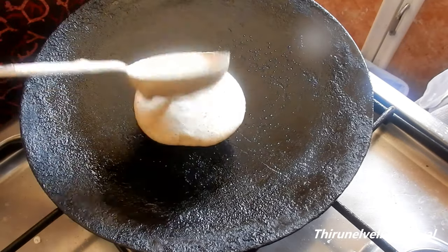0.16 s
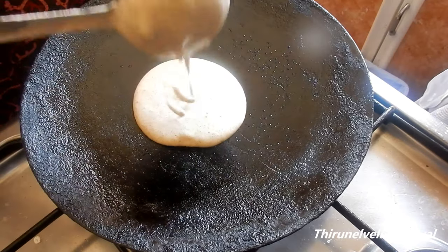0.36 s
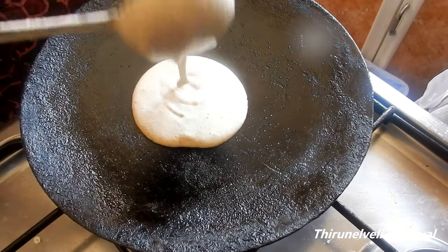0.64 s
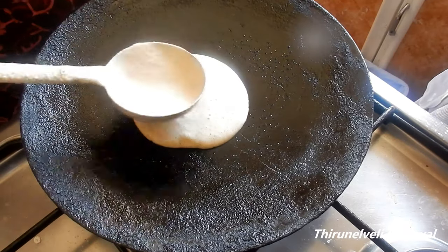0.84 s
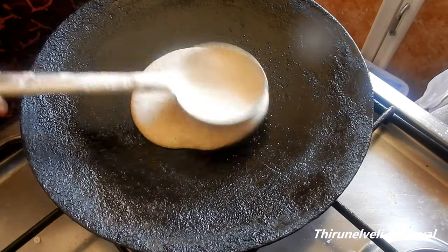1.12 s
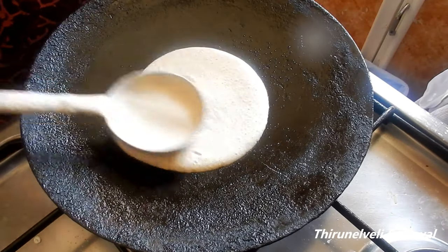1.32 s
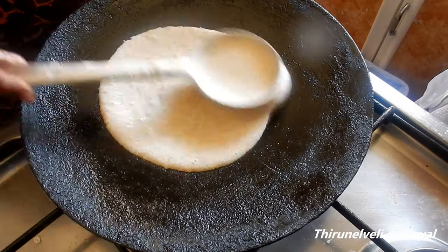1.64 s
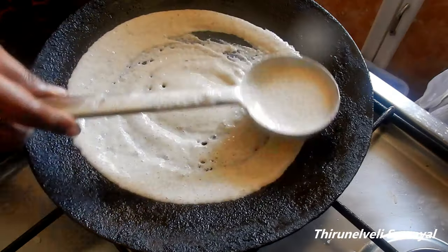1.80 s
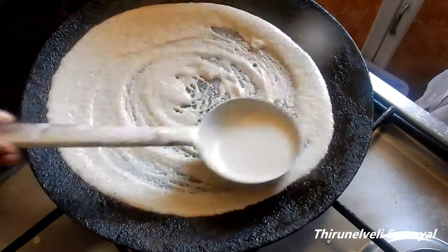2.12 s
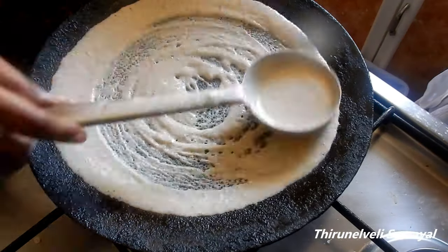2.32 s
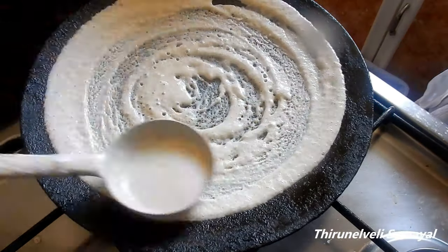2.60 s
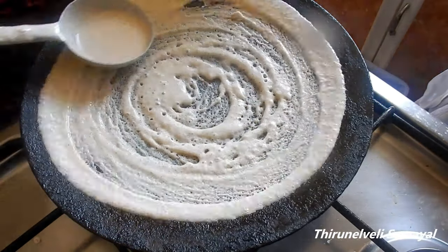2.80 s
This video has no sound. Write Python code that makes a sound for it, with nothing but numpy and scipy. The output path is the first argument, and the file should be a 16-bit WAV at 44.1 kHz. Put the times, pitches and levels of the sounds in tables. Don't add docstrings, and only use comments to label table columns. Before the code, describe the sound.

Roaring, crackling sizzle of batter on hot iron cuts to a softer ladle scrape with fizzing and squeals

```python
import sys
import numpy as np
from scipy import signal
from scipy.fft import rfft, irfft
from scipy.io import wavfile
from scipy.ndimage import uniform_filter1d

SR = 44100
rng = np.random.default_rng(int(sys.argv[2]) if len(sys.argv) > 2 else 0)


def linear_from_db(decibels):
    return 10 ** (np.asarray(decibels, float) / 20)


def file_out(sig):
    cols = np.atleast_2d(sig).T
    lim = np.clip(cols, -1, 1)
    pcm = np.round(lim * 32767).astype(np.int16)
    wavfile.write(sys.argv[1], SR, pcm)


N = 130095
T = np.arange(N) / SR
SPLICE_S, RESUME_S = 1.769, 1.829

# (time [s], steam roar level [dB], crackle level [dB])
BOIL_LEVELS = [(0, -26.5, -46), (.1, -24, -45.5), (.2, -25, -48), (.33, -24.5, -46.5), (.43, -27.5, -49),
               (.6, -27, -49.5), (.72, -26, -49), (.83, -27, -48), (.9, -27, -48), (1.01, -25.5, -59),
               (1.08, -28, -52), (1.14, -27, -53), (1.175, -28.5, -58), (1.21, -24.5, -50),
               (1.27, -29, -44), (1.45, -32, -43), (1.6, -32.5, -45.5), (1.77, -32, -47)]
# (time [s], scrape level [dB], fizz level [dB])
SPREAD_LEVELS = [(1.835, -52, -39), (1.865, -44.5, -34.5), (1.91, -52.5, -42), (2.01, -51.5, -47),
                 (2.09, -52, -45.5), (2.12, -45.5, -41), (2.21, -45.5, -41.5), (2.245, -52, -47),
                 (2.27, -46, -43), (2.45, -46.5, -43), (2.6, -47.5, -44), (2.72, -46, -43),
                 (2.755, -47.5, -44), (2.78, -49.5, -41), (2.85, -46.5, -43.5), (2.95, -47, -46)]
# (frequency [Hz], level [dB])
WIDTH_BOIL = [(60, -9.5), (200, -8.5), (700, -20.5), (2400, -23.5), (4400, -20), (8000, -9), (15000, -5)]
# (frequency [Hz], level [dB])
WIDTH_SPREAD = [(200, -1), (700, -5), (1300, -11), (4400, -10), (8000, -19), (15000, -12)]


def unit(x):
    return x / np.sqrt(np.mean(x ** 2))


def curve(table, column):
    rows = np.array(table)
    return linear_from_db(np.interp(T, rows[:, 0], rows[:, column]))


def noise_pair():
    return rng.standard_normal((2, N))


def walk(rate_hz):
    hold = int(SR / rate_hz)
    steps = np.repeat(rng.standard_normal(N // hold + 1), hold)
    slewed = uniform_filter1d(uniform_filter1d(steps, hold), hold)
    return unit(slewed[:N])


def colour(x, *shapes):
    log_hz = np.log(np.arange(1025) * SR / 2048 + 1)
    db = 0
    for shape in shapes:
        hz, level_db = np.array(shape).T
        db = db + np.interp(log_hz, np.log(hz), level_db)
    cepstrum = irfft(np.log(linear_from_db(db)))
    cepstrum[1:1024] *= 2
    cepstrum[1025:] = 0
    impulse = irfft(np.exp(rfft(cepstrum)))
    return signal.fftconvolve(x, impulse)[:N]


def resonate(x, hz, width_hz):
    return signal.lfilter(*signal.iirpeak(hz, hz / width_hz, SR), x)


def ring(x, modes):
    out = np.zeros(N)
    for hz, width_hz, db in modes:
        shimmer_db = 1.8 * walk(25.)
        out += linear_from_db(db + shimmer_db) * resonate(x, hz, max(width_hz, 5))
    return unit(out)


def grains(rate_hz, spread_db, hiss):
    chance, sign, luck = rng.random((3, N))
    size = linear_from_db(-spread_db * np.log(luck + .02))
    bursts = (chance < rate_hz / SR) * np.sign(sign - .5) * size
    return unit(unit(bursts) + hiss * rng.standard_normal(N))


def wide(x, other, shape, width, pan_db):
    mid = colour(x, shape)
    side = colour(other, shape, width)
    norm = np.sqrt(np.mean(mid ** 2))
    pan = linear_from_db(np.array([[pan_db], [-pan_db]]) / 2)
    return (mid + side * np.array([[1], [-1]])) / norm * pan


def hits(table, tail_s):
    kick = np.zeros(N)
    for s, db in table:
        kick[int(s * SR)] = linear_from_db(db)
    tail = signal.lfilter([1], [1, -np.exp(-1 / (tail_s * SR))], kick)
    return kick + .12 * tail * rng.standard_normal(N)


def iron(x):
    # (frequency [Hz], width [Hz], level [dB])
    iron_modes = [(878, 13, -18), (1208, 38, -2.5), (1340, 52, -1.5), (1492, 10.5, 5), (1693, 54, 0.5),
                  (1980, 55, -8.5), (2111, 41, 0.5), (2325, 39, 4), (2534, 49, -2), (2600, 7.4, 4),
                  (2800, 44, -4.5), (3070, 71, -6.5), (3214, 110, -7), (4340, 82, -10)]
    # (frequency [Hz], width [Hz], share removed [1])
    dead_spots = [(686, 127, 0.76), (1033, 27, 0.62), (1473, 190, 0.49), (2510, 105, 0.51),
                  (3840, 490, 0.56)]
    y = x + linear_from_db(-14) * ring(x, iron_modes)
    for hz, width_hz, share in dead_spots:
        y = y - share * resonate(y, hz, width_hz)
    cover_s, covered_s, covered_share = 1.12, 1.2, 0.87
    bare = np.interp(T, [cover_s, covered_s], [1, covered_share])
    return bare * y + (1 - bare) * x


def steam_roar():
    # (frequency [Hz], density [dB per Hz])
    roar_shape = [(300, -29.5), (700, -7.5), (850, -5), (2300, -3.5), (3400, -5), (4400, -8), (6200, -13),
                  (12000, -34.5), (15600, -72)]
    flutter = linear_from_db(.4 * walk(40) + .9 * walk(80))
    steam = [iron(grains(4000., 1.7, 0.91) * flutter) for _ in range(2)]
    return wide(*steam, roar_shape, WIDTH_BOIL, 1.45) * curve(BOIL_LEVELS, 1)


def crackle():
    # (frequency [Hz], density [dB per Hz])
    crackle_shape = [(2500, -17), (4500, 7.5), (7000, 3.5), (11000, -6.5), (16000, -14.5)]
    ticks = grains(900., 2.8, .5) * linear_from_db(1.4 * walk(30))
    scattered = ticks * rng.standard_normal(N)
    return wide(ticks, scattered, crackle_shape, WIDTH_BOIL, 1.45) * curve(BOIL_LEVELS, 2) * linear_from_db(8.5)


def pops():
    # (time [s], peak level [dB])
    pop_hits = [(0.0194, -27), (0.0428, -35), (0.0702, -32), (0.1281, -28), (0.1585, -29), (0.2279, -43),
                (0.2279, -27), (0.2573, -32), (0.2718, -25), (0.3351, -34), (0.3576, -24), (0.379, -33),
                (0.3935, -28), (0.4314, -27), (0.4599, -37), (0.4843, -30), (0.4973, -24), (0.5147, -23),
                (0.5492, -33), (0.6494, -37), (0.6654, -27), (0.7093, -33), (0.7462, -34), (0.7622, -28),
                (0.8106, -33), (0.8195, -30), (0.8465, -28), (0.8954, -29), (0.9996, -36), (1.0101, -36),
                (1.0241, -26), (1.1263, -49), (1.1263, -29), (1.1578, -31), (1.1877, -31), (1.2166, -36),
                (1.2166, -22), (1.289, -27), (1.297, -25), (1.3189, -29), (1.3254, -28), (1.3309, -26),
                (1.3763, -27), (1.4072, -27), (1.4232, -24), (1.4441, -25), (1.4536, -26), (1.4726, -27),
                (1.5015, -21), (1.5419, -27), (1.5883, -28), (1.6372, -30), (1.6372, -27), (1.6601, -30),
                (1.6926, -32), (1.711, -32), (1.7255, -27), (1.7664, -28)]
    # (frequency [Hz], level [dB])
    pop_shape = [(3000, -36), (6000, -19), (8500, -10.5), (11000, -6), (16000, -8)]
    # (time [s], peak level [dB])
    splat_hits = [(0.015, -19), (0.0534, -24), (0.3044, -22.5), (0.337, -22), (0.4964, -15), (0.7617, -28),
                  (0.8454, -23), (1.0174, -23), (1.054, -20), (1.1578, -17), (1.2164, -23), (1.3294, -21),
                  (1.4105, -24), (1.454, -28), (1.5007, -21), (1.5904, -16), (1.6396, -21), (1.7254, -21)]
    # (frequency [Hz], level [dB])
    splat_shape = [(1200, -37), (3000, 0), (5500, 2), (8000, 0), (13000, -28.5)]
    pop = colour(hits(pop_hits, tail_s=.0009), pop_shape) * linear_from_db(19.5)
    splat = colour(hits(splat_hits, tail_s=.0041), splat_shape) * linear_from_db(11.5)
    return (pop + splat) * linear_from_db(np.array([[1.6], [-1.6]]))


def flame():
    # (frequency [Hz], density [dB per Hz])
    flame_shape = [(18, -40), (30, -63), (56, -14), (166, 0), (241, -8), (282, -4), (700, -10), (910, -42),
                   (1540, -120)]
    gas = noise_pair() * linear_from_db(0.2 * walk(11.0))
    rumble = wide(*gas, flame_shape + [(1400, -68)], WIDTH_BOIL, 0.48)
    return rumble * curve(BOIL_LEVELS, 1) * linear_from_db(-15.5)


def steam_air():
    return wide(*noise_pair(), [(6000, -28), (10000, -5)], WIDTH_BOIL, 1.5) * linear_from_db(-68)


def boil():
    return steam_roar() + crackle() + pops() + flame() + steam_air()


def scrape():
    # (frequency [Hz], density [dB per Hz])
    scrape_shape = [(140, -83), (230, -37.5), (951, -6.5), (1060, -8.5), (1660, 0.5), (2510, -6.5),
                    (2840, -3), (3530, -10.5), (8000, -13), (10400, -46), (17600, -120)]
    # (frequency [Hz], width [Hz], level [dB])
    bowl_modes = [(473, 24, -6), (676, 53, -2), (971, 18, -3), (1154, 49, -11), (1295, 50, -7.5),
                  (1626, 77, -9.5), (1890, 22, -7), (2690, 67, -12), (2820, 50, -9), (3950, 150, -8),
                  (4960, 92, -11), (6000, 96, -11.5)]
    rub = [grains(4000., 2.1, 1.5) * linear_from_db(.8 * walk(30)) for _ in range(2)]
    rung = [r + linear_from_db(-8.5) * ring(r, bowl_modes) for r in rub]
    shape = [(100, -73)] + scrape_shape + [(11000, -55)]
    return wide(*rung, shape, WIDTH_SPREAD, .1) * curve(SPREAD_LEVELS, 1) * linear_from_db(3.0)


def rasp():
    # (frequency [Hz], level [dB])
    rasp_shape = [(2500, -29.5), (4500, -6), (6100, -2), (7200, -19), (9000, -25)]
    growth, pivot_db = 4.6, -45
    press = (curve(SPREAD_LEVELS, 1) / linear_from_db(pivot_db)) ** growth
    level = linear_from_db(-55 + 2.1 * walk(40.07))
    return wide(*noise_pair(), rasp_shape, WIDTH_SPREAD, 0.18) * press * level


def fizz():
    # (frequency [Hz], density [dB per Hz])
    fizz_shape = [(4000, -9), (6900, -13.5), (7600, -4), (10200, 0.5), (11500, -2), (13000, -3),
                  (16000, -4.5)]
    # (frequency [Hz], level [dB])
    spit_shape = [(7000, -25), (10500, -12), (12500, 11), (14000, 0), (16000, -3)]
    fine = [grains(2500., 4.2, 1.13) * linear_from_db(0.65 * walk(24.9)) for _ in range(2)]
    steady = wide(*fine, [(1500, -59)] + fizz_shape, WIDTH_SPREAD, .4) * curve(SPREAD_LEVELS, 2)
    peak_s, fade_db_per_s = 1.865, 57
    spit_db = -41 - fade_db_per_s * np.abs(T - peak_s)
    return steady + wide(*fine[::-1], spit_shape, WIDTH_SPREAD, 1.2) * linear_from_db(spit_db)


def squeaks():
    # (start [s], length [s], start pitch [Hz], end pitch [Hz], level [dB])
    whistles = [
        (2.17, .07, 1350, 1320, -48),
        (2.25, .1, 1305, 1275, -51),
        (2.69, .09, 3900, 4120, -56),
        (2.122, .022, 6100, 6100, -51),
        (2.16, .014, 6050, 5950, -53),
        (2.196, .012, 6100, 6000, -52),
        (2.265, .018, 6150, 6200, -51),
        (2.66, .05, 1310, 1320, -54),
        (2.09, .13, 1640, 1630, -53),
        (2.65, .05, 2830, 2840, -52),
    ]
    # (time [s], pitch [Hz], level [dB])
    rising = [
        (2.43, 1370, -75),
        (2.47, 1425, -59),
        (2.53, 1513, -52),
        (2.58, 1590, -50),
        (2.62, 1640, -41.5),
        (2.69, 1706, -43),
        (2.73, 1763, -46.5),
        (2.77, 1790, -75),
    ]
    # (time [s], pitch [Hz], level [dB])
    sagging = [
        (1.94, 875, -85),
        (1.98, 865, -66),
        (2.15, 800, -70),
        (2.271, 740, -58.5),
        (2.36, 685, -55),
        (2.42, 645, -56),
        (2.46, 630, -85),
    ]
    out = np.zeros(N)
    wobble = walk(59.58)
    for s, length_s, hz0, hz1, db in whistles:
        p = np.clip((T - s) / length_s, 0, 1)
        phase = 2 * np.pi * np.cumsum(hz0 + (hz1 - hz0) * p + 4.0 * wobble) / SR
        out += linear_from_db(db + 4.5 + 1.2 * wobble) * np.sin(np.pi * p) * np.sin(phase)
    for squeal in rising, sagging:
        s, hz, db = np.array(squeal).T
        phase = 2 * np.pi * np.cumsum(np.interp(T, s, hz) + 8.0 * wobble) / SR
        level = linear_from_db(np.interp(T, s, db, -200, -200) + 2.5 * walk(35))
        out += np.sqrt(2) * level * np.sin(phase)
    return out * np.array([[1.2], [.8]])


def handle():
    # (time [s], level [dB])
    bump_hits = [
        (1.905, -73),
        (1.945, -69),
        (2.053, -65),
        (2.126, -66),
        (2.225, -72),
    ]
    bumps = colour(hits(bump_hits, tail_s=.002), [(30, 5), (300, 1), (900, -32)]) * linear_from_db(35)
    shudder = wide(*noise_pair(), [(40, -3), (300, 0), (600, -27)], WIDTH_SPREAD, 2.7)
    shudder_end_s = 2.16
    return bumps + shudder * linear_from_db(-90 + 4.7 * walk(9.3)) * (T < shudder_end_s)


def spread():
    return scrape() + rasp() + fizz() + squeaks() + handle()


def scene():
    leak_db, leak_t60_s, leak_end_s, floor_db = -22, .02, 1.805, -43
    decay_db = leak_db - 60 * np.clip(T - SPLICE_S, 0, 1) / leak_t60_s
    leak = (linear_from_db(decay_db) + linear_from_db(floor_db)) * (T < leak_end_s)
    first = uniform_filter1d(np.where(T < SPLICE_S, 1, leak), size=30)
    fade_in_s = .0007
    second = np.clip((T - RESUME_S) / fade_in_s, 0, 1)
    return boil() * first + spread() * second


def band_limit(x):
    return signal.sosfilt(signal.butter(12, 15900, fs=SR, output="sos"), x)


def record(dry):
    live = uniform_filter1d(1. * ((T < SPLICE_S) | (T > RESUME_S)), size=200)
    top_hz, offset = 15750, -.0004
    top_cut = signal.ellip(12, .2, 90, top_hz, fs=SR, output="sos")
    mix = signal.sosfilt(top_cut, dry) + offset * live
    return band_limit(mix)


dry = scene()
out = record(dry)
file_out(out)
```